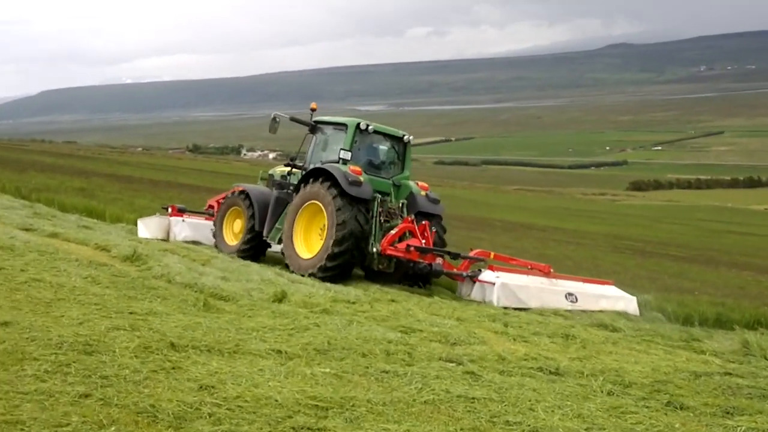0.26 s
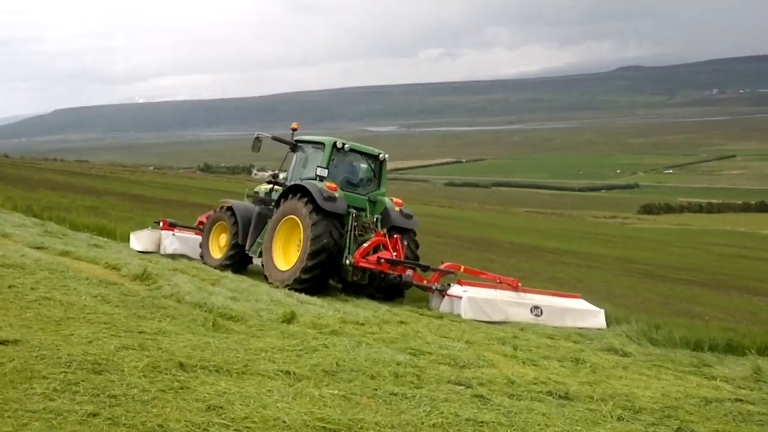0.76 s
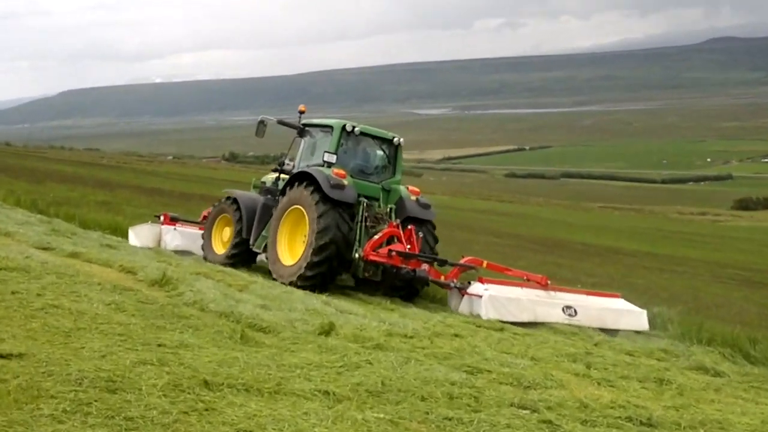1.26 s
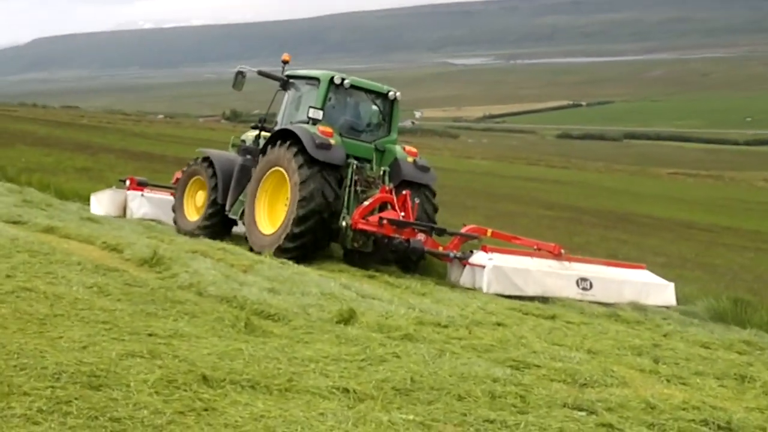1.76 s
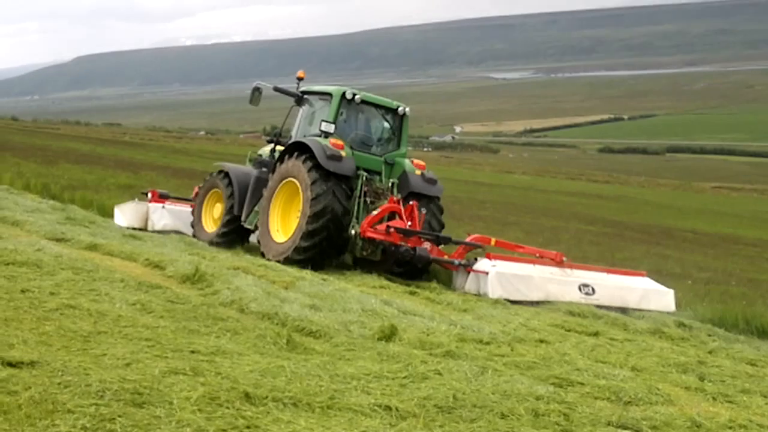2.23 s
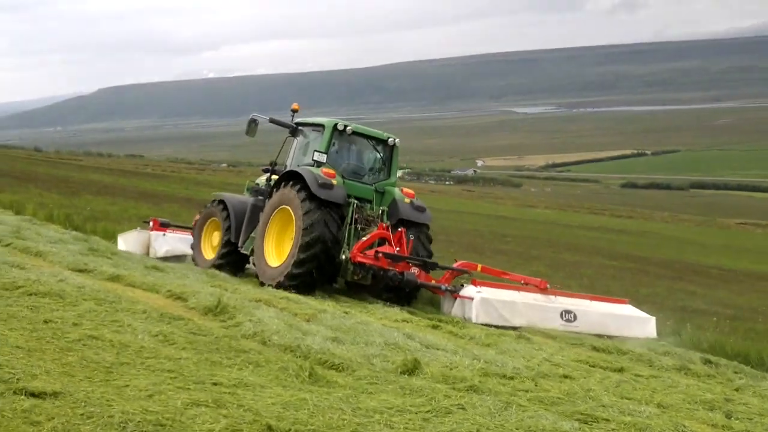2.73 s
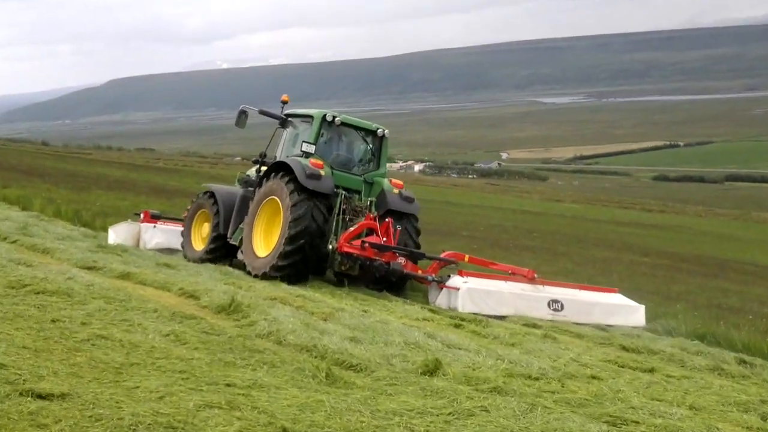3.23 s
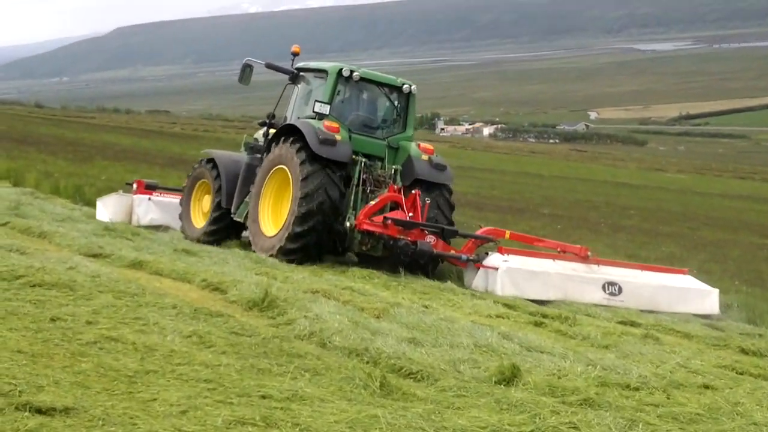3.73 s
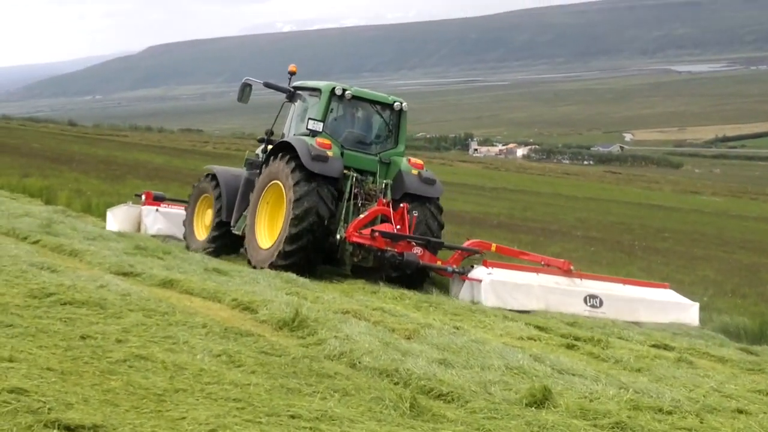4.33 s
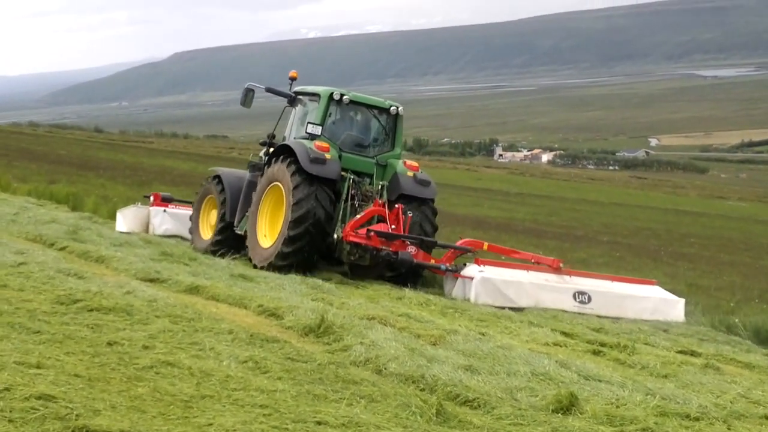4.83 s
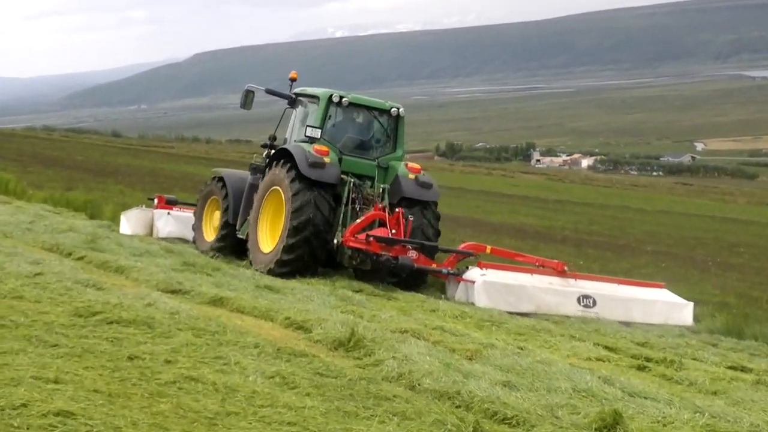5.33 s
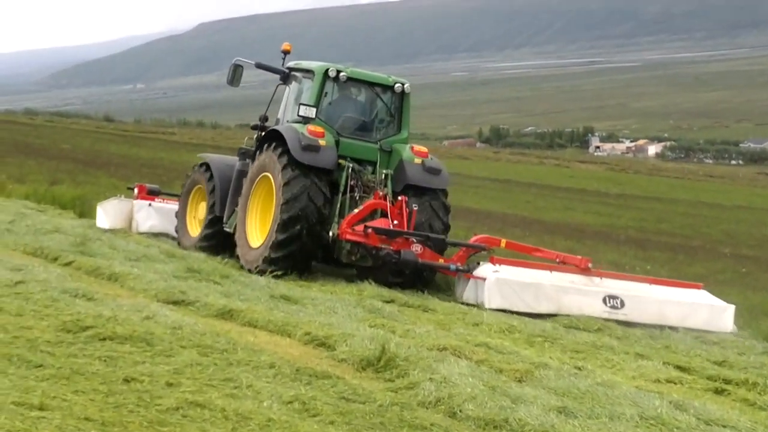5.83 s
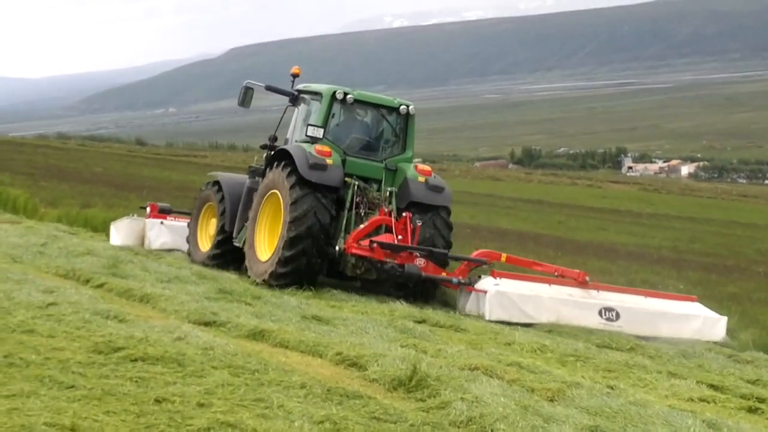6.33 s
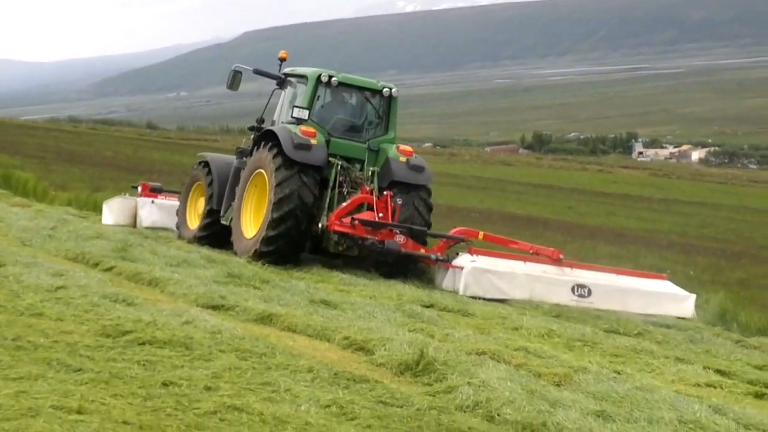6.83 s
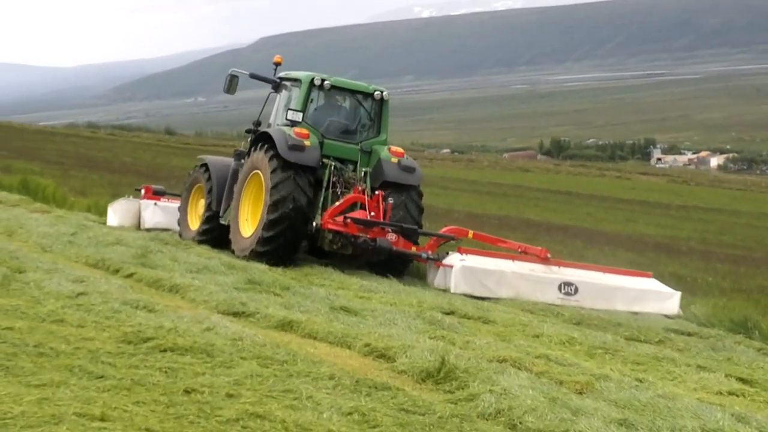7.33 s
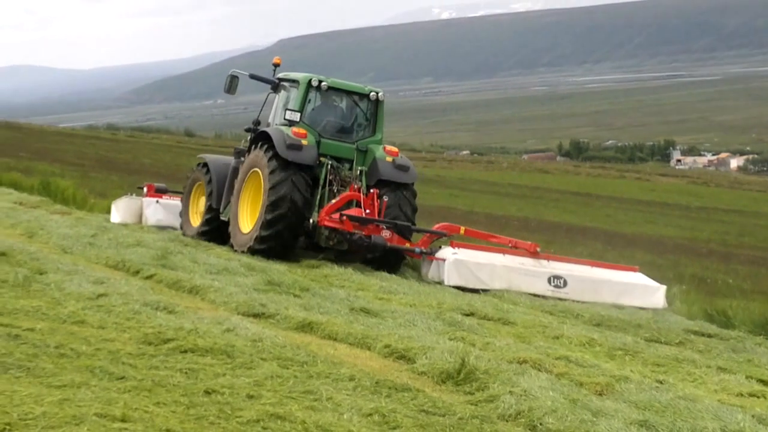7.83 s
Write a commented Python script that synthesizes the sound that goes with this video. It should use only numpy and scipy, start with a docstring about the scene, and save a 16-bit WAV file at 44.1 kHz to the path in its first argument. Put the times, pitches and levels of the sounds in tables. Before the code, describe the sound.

On an open hillside, wind rumbles and slaps an unprotected stereo microphone, mostly on the right, hardest for the first three seconds. Beneath it a close single-cylinder engine putters about thirteen times a second. Farther away a diesel tractor under steady load drones while its mowers whirr, clatter and hiss through grass. As the wind eases, the engines come forward, with occasional later thumps.

```python
"""Wind rumbles and flaps on the microphone, mostly its right port, hardest in the first three seconds:
coloured noise gated by eddies. Close by, a single-cylinder engine putters: puffs ring a silencer.
Some way off on an open hillside a six-cylinder diesel tractor works its grass mowers: a firing drone,
shaft and gear lines locked to the crank, and shaped noise for clatter and disc hiss. One tiny tick."""
import sys
import numpy as np
from scipy import signal
from scipy.fft import rfft, irfft
from scipy.io import wavfile
from scipy.ndimage import uniform_filter1d

SR = 44100
rng = np.random.default_rng(int(sys.argv[2]) if len(sys.argv) > 2 else 0)


def pcm_store(signal):
    """Save signal as 16-bit PCM."""
    levels = np.round(np.clip(np.atleast_2d(signal), -1, 1) * 32767)
    wavfile.write(sys.argv[1], SR, levels.astype(np.int16).T)


N = 355887  # samples

# wind strength, before port trims: time_s, level_db
WIND_LEVEL = [(0, -16), (0.4, -12.5), (1.0, -12), (1.35, -13.5), (2.0, -12), (2.5, -12.8), (3.1, -17),
              (4.2, -16.3), (5.4, -19), (6.5, -16), (6.8, -19), (7.15, -16.5), (8.07, -18.5)]
# spectral shape of the rumble: freq_hz, relative_density_db
RUMBLE_COLOUR = [(10, -31), (20, -13), (35, 1.5), (70, -1), (120, -4.5), (200, -11.5), (300, -19),
                 (500, -35.5), (900, -39), (2000, -75), (8000, -110)]
# spectral shape of a flap: freq_hz, relative_density_db
FLAP_COLOUR = [(20, -5), (70, 6.5), (250, 1), (450, -6.5), (800, -25), (1100, -31), (1500, -41.5),
               (2200, -49), (5000, -95)]
# hardest eddies on the right port: centre_s, relative_level_db, length_s, rustle_re_level_db
HARD_EDDIES = [(0.1, -24.5, 0.035, -6), (0.205, -23.0, 0.025, -9), (0.311, -17.0, 0.016, -3),
               (0.336, -17.0, 0.014, -8), (0.365, -15.5, 0.017, -7), (0.399, -18.5, 0.01, -15),
               (0.48, -22.0, 0.035, -6), (0.514, -15.5, 0.022, -6), (0.579, -18.5, 0.01, -11),
               (0.6, -12.0, 0.012, -16), (0.637, -12.5, 0.018, -6), (0.714, -14.0, 0.015, -14),
               (0.79, -12.0, 0.025, -13), (0.886, -21.0, 0.03, -7), (0.935, -18.5, 0.011, -13),
               (1.013, -19.0, 0.014, -5), (1.068, -26.5, 0.014, -8), (1.119, -15.0, 0.05, -12),
               (1.241, -16.0, 0.012, -12), (1.375, -22.5, 0.02, -13), (1.54, -18.5, 0.025, -11),
               (1.614, -17.5, 0.01, -14), (1.663, -13.0, 0.027, -12), (1.725, -25.0, 0.015, -7),
               (1.768, -18.5, 0.022, -11), (1.867, -15.5, 0.01, -12), (1.895, -16.0, 0.03, -11),
               (1.991, -19.5, 0.016, -8), (2.064, -17.5, 0.014, -24), (2.155, -18.5, 0.014, -10),
               (2.188, -16.5, 0.014, -11), (2.249, -14.5, 0.014, -16), (2.333, -17.5, 0.011, -8),
               (2.418, -17.5, 0.012, -17), (2.448, -16.5, 0.014, -16), (2.551, -15.0, 0.016, -10),
               (2.591, -19.0, 0.011, -14), (2.638, -21.0, 0.012, -6), (2.745, -23.5, 0.01, -9),
               (3.377, -20.5, 0.012, -10), (3.444, -24.5, 0.01, -6), (3.795, -19.0, 0.016, -8),
               (4.088, -20.5, 0.013, -11), (4.344, -18.5, 0.018, -13), (4.625, -23.0, 0.01, -7),
               (5.615, -14.0, 0.016, -7), (6.515, -24.0, 0.035, -13), (6.849, -20.0, 0.017, -19),
               (7.118, -20.5, 0.04, -15), (7.18, -19.0, 0.04, -9), (7.242, -23.0, 0.03, -18),
               (7.328, -23.0, 0.03, -11), (7.83, -22, 0.012, -13)]
# sharp-edged eddies on the right port: centre_s, level_db, edge_s, sense (push 1, pull -1)
KNOCK_EVENTS = [(.3088, -3, .0004, -1), (.6297, -6, .0003, -1), (.7859, -8.5, .0004, 1),
                (1.0105, -6, .0003, 1), (1.2419, -7, .0003, -1), (1.3448, -2, .00028, 1),
                (1.4683, 0, .0004, 1), (2.3311, -5.5, .0003, 1), (5.6136, -6.5, .0004, 1),
                (6.9878, 1.5, .0005, -1)]
# ragged wake round each knock: below_knock_db, length_s, rustle_re_level_db
KNOCK_WAKE = (20, .014, -10)
# tick: centre_s, level_db
TICK_EVENT = (2.492, -30)
# idler speed: time_s, firings_per_s
IDLE_SPEED = [(0.0, 13.22), (1.7, 13.396), (2.0, 13.173), (3.7, 13.279), (3.95, 12.673), (4.2, 13.208),
              (5.9, 13.078), (7.2, 13.583), (8.07, 13.271)]
# idler level as heard, low during the strongest early wind: time_s, relative_level_db
IDLER_LEVEL = [(0.0, -2), (0.22, -1), (0.65, -10.5), (1.15, -6), (1.85, -4.5), (2.6, -2), (3.5, 0.3),
               (6.4, 0.4), (7.0, -0.8), (8.07, 0)]
# silencer modes: centre_hz, width_hz, gain_db
SILENCER_MODES = [(60, 25, 41), (83.4, 58, 40.3), (134, 45, 41.2)]
# pipe resonance of the bark: centre_hz, width_hz
BARK_MODE = (185, 150)
# two barks per cycle: delay_after_puff_s, gain_db
BARK_DELAYS = [(.0045, 22.5), (.027, 17.5)]
# tractor engine speed: time_s, firing_rate_hz
TRACTOR_SPEED = [(0, 112.81), (0.5, 112.16), (2.3, 112.02), (3.5, 111.77), (4, 111.32), (5.3, 111.58),
                 (7.4, 111.31), (8.07, 111.71)]
# engine and drive lines: order (x firing rate), relative_left_db, relative_right_db
DRIVE_LINES = [(2, -48, -45), (4, -62, -57), (5, -60, -57), (6, -55, -61), (7, -59, -57), (7.5, -55, -53),
               (10.5, -56, -55), (10.83, -54, -52), (11.5, -52, -52), (12, -47, -52), (13, -52, -62),
               (13.5, -51, -66), (15, -59, -62), (15.5, -59, -63), (18, -53, -57), (21, -56, -62),
               (24, -51, -52), (24.5, -54, -57), (27, -52, -57), (35, -56, -57), (35.67, -54, -55)]
# mower gear meshes: low_order, high_order (x firing rate)
WHINE_ORDERS = (9, 15.17)
# low gear whine, before panning: time_s, level_db
LOW_WHINE_LEVEL = [(0, -41), (.08, -34), (.15, -34), (.2, -40), (.34, -41), (.45, -50.5), (1.3, -50.5),
                   (1.75, -47), (2.1, -49), (3.15, -55), (3.55, -44), (3.7, -53), (4.55, -51), (4.92, -45),
                   (5.24, -54), (5.35, -39), (5.52, -42.5), (5.62, -48), (5.85, -50), (5.94, -45),
                   (6.12, -41), (6.4, -50), (6.55, -54), (6.68, -49), (6.95, -47), (7.08, -56), (7.4, -56),
                   (7.65, -46), (7.8, -49.5), (7.95, -43), (8.07, -46)]
# high gear whine, before panning: time_s, level_db
HIGH_WHINE_LEVEL = [(0, -40), (.3, -45), (.55, -65), (1.1, -49), (1.45, -48), (1.6, -55), (2.4, -66),
                    (2.6, -48), (3.15, -51), (3.55, -45), (3.9, -51), (4.8, -55), (5.0, -41.5), (5.58, -41),
                    (5.75, -55), (6.9, -52), (7.35, -57), (7.7, -49), (8.07, -55)]
# machine noise colour, left port: freq_hz, relative_density_db
LEFT_COLOUR = [(150, -61), (300, -62), (450, -77), (800, -68.5), (1080, -73.5), (1300, -63.5), (1900, -65),
               (2070, -68), (2320, -64), (2550, -69), (2730, -67.5), (2870, -76), (3050, -66), (3250, -71),
               (3500, -67), (4050, -70), (4500, -68), (4800, -75.5), (6000, -77), (6500, -82),
               (7700, -93.5), (11000, -94.5)]
# machine noise colour, right port: freq_hz, relative_density_db
RIGHT_COLOUR = [(300, -66), (800, -71.5), (1250, -63), (1580, -80.5), (1950, -68), (2220, -73.5),
                (2600, -68.5), (3600, -72.5), (4300, -68.5), (4850, -77.5), (6500, -75.5), (7900, -87.5),
                (11000, -99), (14000, -112)]
# tractor level as heard (whines apart), low during the strongest early wind: time_s, relative_level_db
TRACTOR_LEVEL = [(0.0, 4), (0.3, 2), (0.55, -5.5), (0.8, -5), (1.25, 0), (1.95, -0.5), (2.16, 1.5),
                 (2.66, -0.5), (3.46, 3.5), (4.71, -0.5), (5.46, 2.0), (6.87, 0), (7.42, -3), (7.67, -0.5),
                 (8.07, -0.5)]
# rasp near 3 kHz against the other machine noise: time_s, gain_db
RASP_GAIN = [(0.0, -1), (1.5, 0), (1.9, 4), (2.66, 1), (5.16, 2.5), (5.31, -2.5), (7.52, -5.5), (8.07, -4)]
# grass hiss against the other machine noise: time_s, gain_db
HISS_GAIN = [(0.0, 0.5), (0.7, 1), (2.41, 4), (3.56, -2), (4.16, 0.5), (5.56, -1), (5.96, 4.5),
             (6.32, -1.5), (8.07, -0.5)]
# phase by which the left port leads: freq_hz, phase_rad
LEFT_LEAD = [(0, 0), (800, 0), (1350, 3.5), (1550, 1), (1670, 1.72), (2180, 2), (2280, 2.1), (2650, 2.5),
             (3100, 3.5), (3800, 4), (4450, 10.5), (5500, 13), (15000, 24)]

# lesser eddies: rate at the strongest wind, mean level under the wind, spread, length, rustle
EDDIES_PER_S, EDDY_BELOW_WIND_DB, EDDY_SCATTER_DB = 15, 15.5, 2
EDDY_MEAN_LENGTH_S, EDDY_RUSTLE_DB = .02, -12
KNOCK_RELEASE_S = .0024
IDLE_START_CYCLES = .092  # share of the cycle already run
SHAFT_WOBBLE_PERIODS = .005  # rms, in firing periods
TOP_HZ = 14900


def undb(db):
    """Decibels to gain."""
    return np.exp(np.asarray(db) * (np.log(10) / 20))


def time_s():
    """Time of each sample."""
    return np.arange(N) / SR


def curve(rows):
    """Second column joined by straight lines in time."""
    rows = np.array(rows)
    return np.interp(time_s(), rows[:, 0], rows[:, 1])


def unit(x):
    """Scale to rms 1."""
    return x / np.sqrt(np.mean(x ** 2))


def even(x):
    """Hold a noise near rms 1 from moment to moment."""
    power = uniform_filter1d(uniform_filter1d(x ** 2, size=300), size=300)
    return x / np.sqrt(power)


def bins_hz():
    """Frequency of each spectral bin, just above zero at DC."""
    return np.arange(N // 2 + 1) * SR / N + 1e-6


def shape(x, gain):
    """Filter by a gain for each bin."""
    return irfft(rfft(x) * gain, N)


def lowpass(hz, order):
    """Zero-phase bin gains that fall above hz."""
    return 1 / (1 + (bins_hz() / hz) ** order)


def colour(points):
    """Bin gains from freq_hz, db points, joined on a log frequency axis."""
    hz, db = np.transpose(points)
    return undb(np.interp(np.log(bins_hz()), np.log(hz), db))


def resonance(hz, width_hz):
    """Bin gains of a damped resonator, about 1 at its centre."""
    s = 1j * bins_hz()
    return s * width_hz / (s * s + s * width_hz + hz ** 2)


def walk(rate_hz):
    """Smooth random wander, rms 1: noise under a Gaussian lowpass."""
    hop = 64
    steps = rng.standard_normal(8192)
    hz = np.arange(len(steps) // 2 + 1) * SR / hop / len(steps)
    slow = irfft(rfft(steps) * np.exp(-(hz / rate_hz) ** 2))
    return unit(np.interp(np.arange(N) / hop, np.arange(len(slow)), slow))


def pan(x, right_db):
    """Place a sound by its right-minus-left level."""
    return undb(np.array([[-right_db], [right_db]]) / 2) * x


def rumble(excess_db, gust_db=3.0, rough_db=3.5, split_hz=220, brighten=0.64):
    """Turbulence on one port; its upper part is burstier and grows faster with the wind than its bass."""
    noise = unit(shape(rng.standard_normal(N), colour(RUMBLE_COLOUR)))
    bass = shape(noise, lowpass(split_hz, 4))
    upper = noise - bass
    gust = walk(14.4)
    bass_gain = unit(undb(gust_db * gust))
    upper_gain = unit(undb(rough_db * gust)) * undb(brighten * excess_db)
    return bass * bass_gain + upper * upper_gain


def lesser_eddies(wind_db, candidates=160):
    """Chance eddies, rows as in HARD_EDDIES; their rate follows the wind's power."""
    place, luck, strength, stretch = rng.random((candidates, 4)).T
    local_db = wind_db[(place * (N - 1)).astype(int)]
    peak_chance = EDDIES_PER_S * N / SR / candidates
    strikes = luck < peak_chance * undb(local_db - wind_db.max()) ** 2
    level_db = local_db - EDDY_BELOW_WIND_DB + EDDY_SCATTER_DB * (2 * strength - 1)
    length_s = EDDY_MEAN_LENGTH_S * (.5 + stretch)
    rows = [place * N / SR, level_db, length_s, np.full(candidates, EDDY_RUSTLE_DB)]
    return np.transpose(rows)[strikes].tolist()


def churn(gain):
    """Flap-coloured noise in one band, held even so that the eddy alone sets the force."""
    return even(shape(rng.standard_normal(N), colour(FLAP_COLOUR) * gain))


def eddies(wind_db, thud_db=7.5, rustle_db=2.5, spread=.34, ragged_db=2, thud_hz=190, rustle_hz=520):
    """Each eddy is a short ragged flap of pressure with a thud under it and its own rustle on top."""
    t, force, rustling = time_s(), np.zeros(N), np.zeros(N)
    below_db, *wake_form = KNOCK_WAKE
    wakes = [(s, db - below_db, *wake_form) for s, db, _, _ in KNOCK_EVENTS]
    for s, db, length_s, bright_db in list(HARD_EDDIES) + wakes + lesser_eddies(wind_db):
        near = slice(*np.searchsorted(t, [s - 2 * length_s, s + 2 * length_s]))
        swell = undb(db) * np.exp(-.5 * ((t[near] - s) / (spread * length_s)) ** 2)
        # overlapping eddies add in power
        force[near] = np.hypot(force[near], swell)
        rustling[near] = np.hypot(rustling[near], swell * undb(bright_db))
    under_thud, under_rustle = lowpass(thud_hz, 12), lowpass(rustle_hz, 12)
    thud = undb(thud_db) * churn(under_thud)
    flap = churn(under_rustle - under_thud)
    rustle = undb(rustle_db) * churn(1 - under_rustle)
    ragged = unit(undb(ragged_db * walk(110)))
    return ragged * (force * (thud + flap) + rustling * rustle)


def knocks():
    """A sharp-edged eddy crosses the port: pressure builds, flips at once and dies away."""
    t = time_s()
    return sum(sense * undb(db) * np.tanh((t - s) / edge_s) * np.exp(-np.abs(t - s) / KNOCK_RELEASE_S)
               for s, db, edge_s, sense in KNOCK_EVENTS)


def wind(left_db=-13, right_db=-1, flap_left_db=-26):
    """Turbulence on both ports: the right one faces the wind, the left is sheltered and quieter."""
    wind_db = curve(WIND_LEVEL)
    flaps = eddies(wind_db) + knocks()
    excess_db = wind_db - wind_db.mean()
    left = undb(left_db + wind_db) * rumble(excess_db)
    right = undb(right_db + wind_db) * rumble(excess_db)
    return np.array([left + undb(flap_left_db) * flaps, right + flaps])


def tick(decay_s=.0006):
    """A tiny bright tick: resonant noise under a two-sided exponential."""
    centre_s, level_db = TICK_EVENT
    envelope = np.exp(-np.abs(time_s() - centre_s) / decay_s)
    ring = np.abs(resonance(7500, 5000) ** 4)
    return undb(level_db) * envelope * unit(shape(rng.standard_normal((2, N)), ring))


def idler(scatter_db=0.54, alternate_db=.5, right_db=5.5, puff_hz=200):
    """One puff every second crank turn rings the silencer's chambers; the putts sound stronger and weaker by
    turns."""
    cycles = IDLE_START_CYCLES + np.cumsum(curve(IDLE_SPEED)) / SR
    fired = np.flatnonzero(np.diff(np.floor(cycles)))
    alternation = (-1) ** np.arange(len(fired))
    puffs = np.zeros(N)
    puffs[fired] = undb(scatter_db * rng.standard_normal(len(fired)) - alternate_db * alternation)
    # neighbouring modes swing in opposite sense at the outlet
    silencer = sum((-1) ** k * undb(db) * resonance(hz, width_hz) ** 2
                   for k, (hz, width_hz, db) in enumerate(SILENCER_MODES))
    arrivals = sum(undb(db) * np.exp(-2j * np.pi * bins_hz() * s) for s, db in BARK_DELAYS)
    bark = resonance(*BARK_MODE) ** 2 * arrivals
    # the valve opens gradually, which rounds each puff
    body = silencer * np.exp(-(bins_hz() / puff_hz) ** 2)
    body = body + bark * np.exp(-(bins_hz() / (2 * puff_hz)) ** 2)
    putter = shape(puffs * undb(curve(IDLER_LEVEL)), body)
    return np.array([putter, undb(right_db) * putter])


def tone(firings, order, flutter_db, blur_rad, rough=0.35):
    """A line locked to the engine; moving air makes it waver and the uneven load roughens it."""
    roughness = 1 + rough * walk(45)
    line = np.sin(2 * np.pi * order * firings + blur_rad * walk(18.0))
    return unit(line * undb(flutter_db * walk(5.2)) * roughness)


def drone(firings, tractor_db, right_db=4, blur_rad=0.61):
    """Tractor exhaust: a note at the firing rate that follows the tractor's level and wavers slowly."""
    drone_db = -27.5 + 1.5 * walk(6) + tractor_db
    note = -np.sqrt(2) * np.sin(2 * np.pi * firings + blur_rad * walk(1.7))
    return pan(note * undb(drone_db), right_db)


def drive(firings, drive_db=-2, flutter_db=2, blur_rad=0.2, fade_db=3.0):
    """Higher orders of the engine and of the shafts it turns, each fading slowly in and out."""
    lines = np.zeros((2, N))
    for order, left_db, right_db in DRIVE_LINES:
        line = tone(firings, order, flutter_db, blur_rad) * undb(fade_db * walk(1.8))
        lines += undb([[left_db], [right_db]]) * line
    return undb(drive_db) * lines


def whines(firings):
    """Two gear meshes in the mowers sing clear lines that swell and fade with the load."""
    low_order, high_order = WHINE_ORDERS
    low = tone(firings, low_order, flutter_db=1, blur_rad=.85, rough=.3) * undb(curve(LOW_WHINE_LEVEL))
    high = tone(firings, high_order, flutter_db=.5, blur_rad=.2, rough=.2) * undb(curve(HIGH_WHINE_LEVEL))
    return pan(low, right_db=7) + pan(high, right_db=-8)


def clatter(firings, repeat=.28, throb=.06):
    """Knocks, chains and blades: noise partly alike in every six-firing cycle, surging at each firing."""
    cycle = rng.standard_normal(2400)
    repeating = cycle[(firings / 6 % 1 * len(cycle)).astype(int)]
    noise = np.sqrt(repeat) * repeating + np.sqrt(1 - repeat) * rng.standard_normal(N)
    return noise * (1 + throb * np.cos(2 * np.pi * firings))


def fading(ports, size=1024, depth_db=2.3):
    """Paths through moving air and off the slope interfere: narrow bands swell and fade on their own."""
    frames = signal.stft(ports, nperseg=size)[2]
    patches = uniform_filter1d(rng.standard_normal(frames.shape[1:]), size=2, axis=0)
    patches = uniform_filter1d(patches, size=50, axis=1)
    faded = frames * undb(depth_db * unit(patches))
    return unit(signal.istft(faded, nperseg=size)[1][:, :N])


def machine(firings, rasp_db, hiss_db, diffuse_hz=5000, flicker_db=1.67, machine_db=-2.0):
    """Clatter and cut grass at both ports; the field scatters treble more, so it differs at each port."""
    scattered = bins_hz() / (bins_hz() + diffuse_hz)  # power share
    common = shape(clatter(firings), np.sqrt(1 - scattered))
    diffuse = shape(rng.standard_normal((2, N)), np.sqrt(scattered))
    ports = fading(common + diffuse)
    ports = shape(ports, np.array([colour(LEFT_COLOUR), colour(RIGHT_COLOUR)])) * np.sqrt(SR / 2)
    rasp = shape(ports, np.abs(resonance(2930, 580)) ** 2)
    hiss = shape(ports, 1 / (1 + (7500 / bins_hz()) ** 8))
    body = ports - rasp - hiss
    sound = body * undb(0.38 * flicker_db * walk(33))
    sound += rasp * undb(rasp_db + flicker_db * walk(5.2))
    sound += hiss * undb(hiss_db + flicker_db * walk(14))
    # the air absorbs the highest treble on the way
    return undb(machine_db) * shape(sound, lowpass(13000, 12))


def tractor():
    """All parts turn with one crankshaft; the left port hears the higher sounds a little sooner."""
    # uneven load twists the shafts, so high lines waver most
    firings = np.cumsum(curve(TRACTOR_SPEED)) / SR + SHAFT_WOBBLE_PERIODS * walk(7.7)
    tractor_db = curve(TRACTOR_LEVEL)
    noise = machine(firings, curve(RASP_GAIN), curve(HISS_GAIN))
    left, right = whines(firings) + undb(tractor_db) * (drive(firings) + noise)
    lag_rad = np.interp(bins_hz(), *np.transpose(LEFT_LEAD))
    right = shape(right, np.exp(-1j * lag_rad))
    return drone(firings, tractor_db) + np.array([left, right])


def scene():
    """Wind on the microphone, a tick, idler near, tractor far."""
    return wind() + tick() + idler() + tractor()


def record(dry):
    """Round peaks near full scale, fade both ends over 4 ms and cut the top."""
    rounded = dry / (1 + (dry / .98) ** 6) ** (1 / 6)
    to_end = np.minimum(np.arange(N), np.arange(N)[::-1])
    ends = np.minimum(1, to_end / (.004 * SR))
    top_cut = signal.ellip(10, .2, 90, TOP_HZ, fs=SR, output="sos")
    return signal.sosfilt(top_cut, rounded * ends)


dry = scene()
out = record(dry)
pcm_store(out)
```